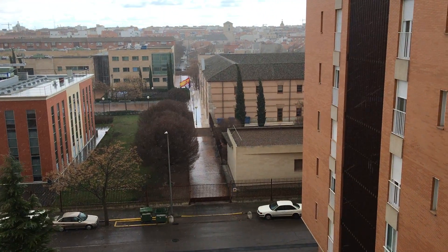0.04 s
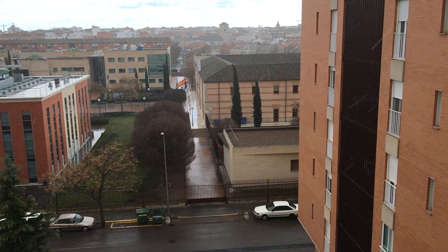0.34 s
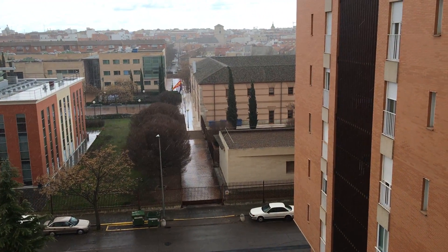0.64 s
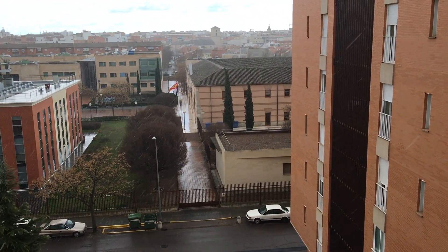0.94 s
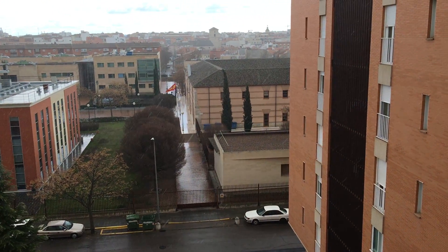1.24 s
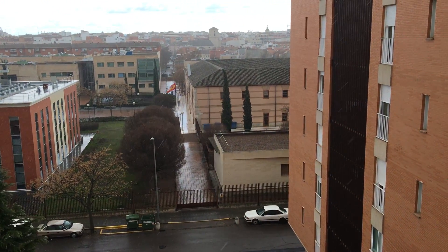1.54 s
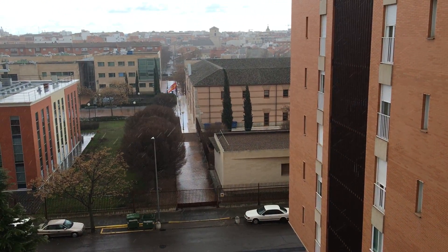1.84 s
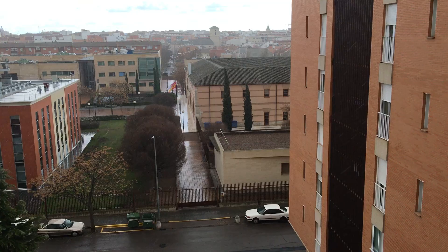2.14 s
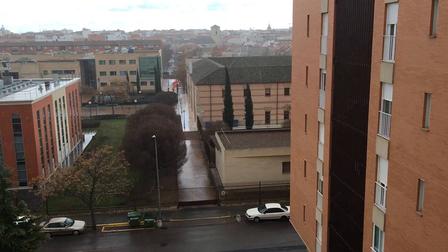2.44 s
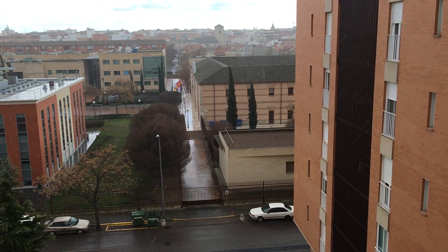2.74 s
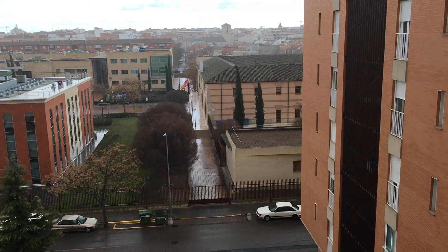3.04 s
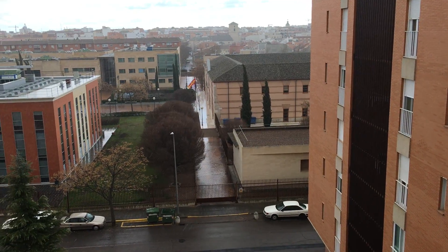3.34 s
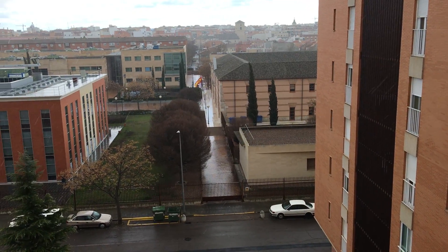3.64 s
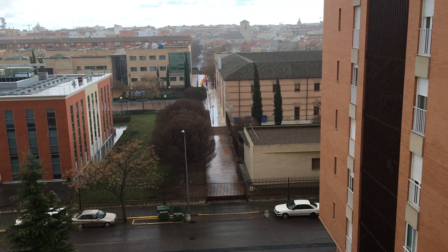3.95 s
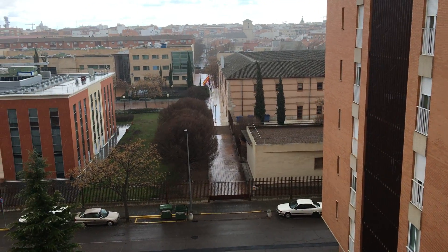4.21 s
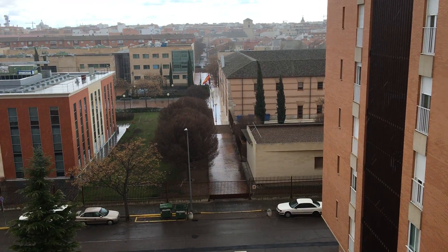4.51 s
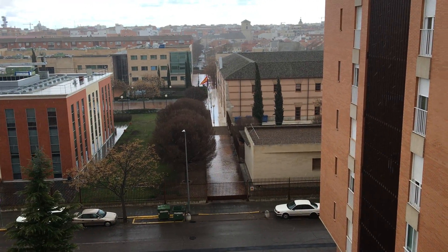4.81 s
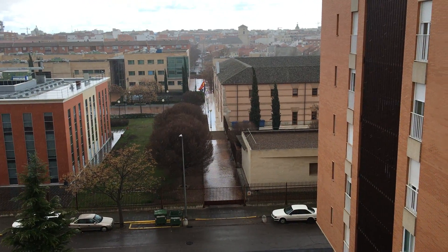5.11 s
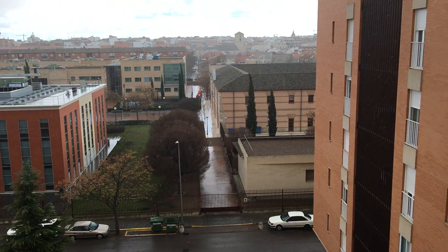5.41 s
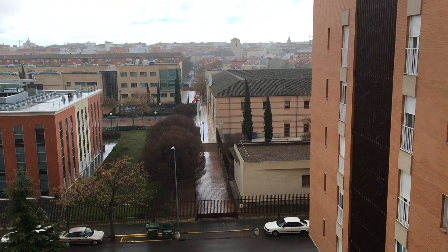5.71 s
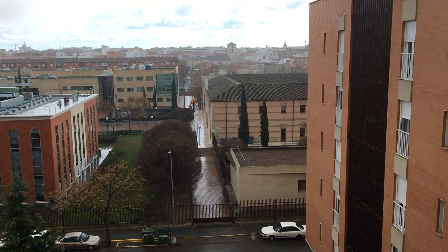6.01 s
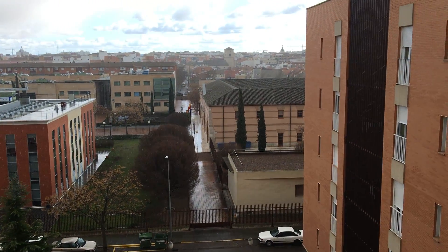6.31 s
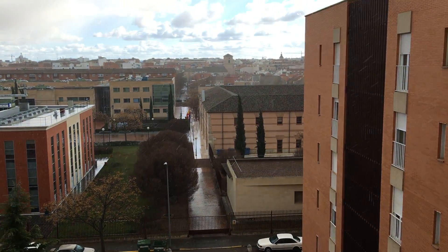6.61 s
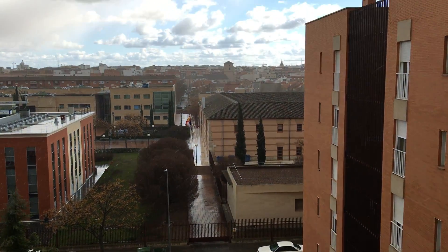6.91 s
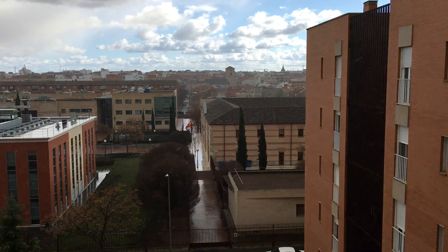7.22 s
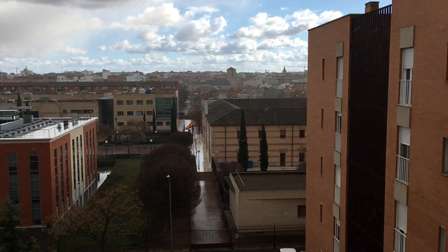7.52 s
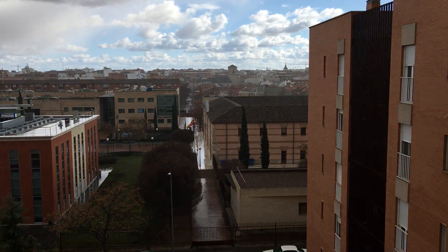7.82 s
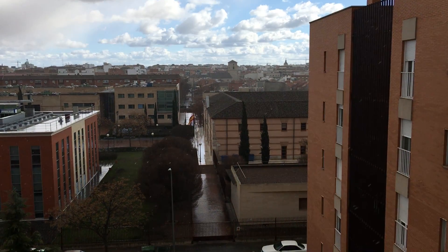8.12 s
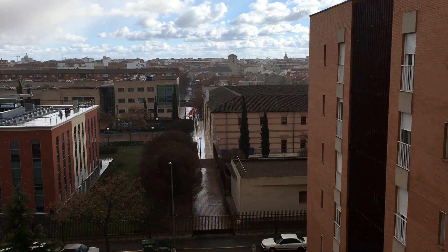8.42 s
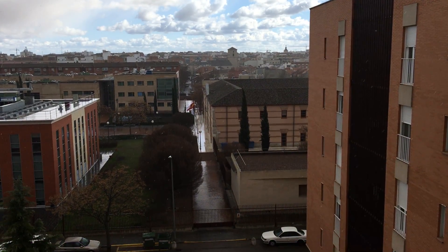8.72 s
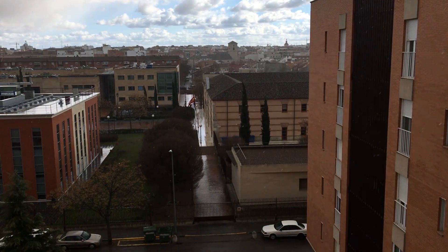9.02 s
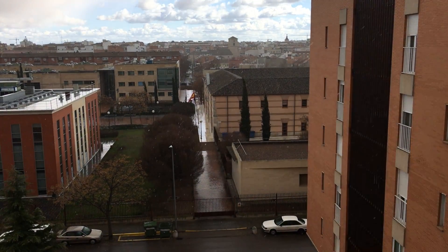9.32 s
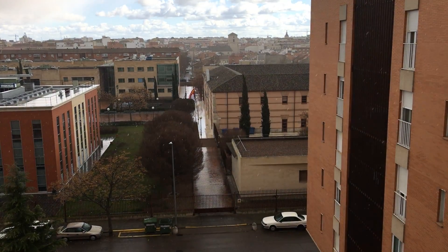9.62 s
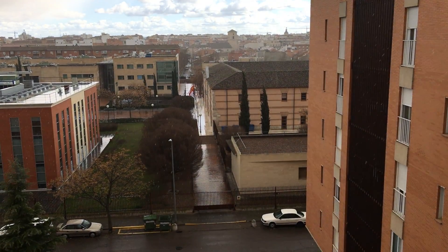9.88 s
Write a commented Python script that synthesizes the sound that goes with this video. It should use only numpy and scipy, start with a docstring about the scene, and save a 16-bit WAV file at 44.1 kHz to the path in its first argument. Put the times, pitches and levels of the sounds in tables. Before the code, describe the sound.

Light sleet hisses and ticks on a window sill while gusty wind thumps the microphone above faint wet street traffic.

```python
"""Light sleet over a wet street

Heard from a high window. Gusts rumble on the microphone and break into short buffets. Fine pellets hiss and
patter over the wash of distant tyres; pellets tap the sill and small knocks sound close by. A thin top hiss
lifts for a moment. Later, a far vehicle's brakes sing faintly."""
import sys
import numpy as np
from scipy import signal
from scipy.fft import rfft, irfft
from scipy.io import wavfile
from scipy.ndimage import uniform_filter1d

SR = 44100
rng = np.random.default_rng(int(sys.argv[2]) if len(sys.argv) > 2 else 0)


def generate_wav(sig):
    """Save sig (samples, or channels by samples) to the path in sys.argv[1] as 16-bit PCM at SR."""
    pcm = np.round(np.clip(np.atleast_2d(sig).T, -1, 1) * 32767).astype(np.int16)
    wavfile.write(sys.argv[1], SR, pcm)


N = 438794
TIME = np.arange(N) / SR
FREQS = np.maximum(np.arange(N // 2 + 1) * SR / N, 1)
BLOCK = 8192  # samples per tap or buffet
BLOCK_FREQS = np.maximum(np.arange(BLOCK // 2 + 1) * SR / BLOCK, 1)

# gusts on the microphone: (start [s], hold [s], relative level [dB])
WIND_GUSTS = [(.07, 0.02, -35.5), (.2, 0.077, -36), (.34, 0.26, -33), (.67, .22, -30), (1.19, 0.029, -38),
              (1.52, 0.25, -42), (1.88, 0.3, -36.5), (2.12, 0.1, -34.5), (2.3, 0.057, -38),
              (2.76, 0.2, -46.5), (3.58, 0.083, -31.5), (3.78, 0.16, -31.5), (4.03, 0.34, -24),
              (4.52, 0.049, -23.5), (4.62, .13, -30.5), (4.79, 0.093, -27.5), (5.01, 0.13, -34),
              (5.6, 0.22, -29.5), (6.02, 0.11, -36.5), (6.34, 0.16, -26.5), (6.6, 0.11, -27),
              (6.88, 0.4, -32), (6.99, 0.072, -21), (7.36, .19, -26), (7.58, 0.16, -40), (8.05, 0.13, -29),
              (8.28, 0.017, -29), (8.45, 0.29, -43), (8.8, 0.025, -31), (9.16, 0.25, -40),
              (9.36, 0.09, -28.5), (9.59, 0.15, -26), (9.82, 0.15, -34)]
# distant traffic: (time [s], relative level [dB])
TRAFFIC_LEVELS = [(0, -51.5), (2.9, -52), (4.4, -53.5), (9.95, -54)]
# tyre wash spectrum: (frequency [Hz], relative density [dB])
TRAFFIC_SPECTRUM = [(20, -24), (35, -6), (70, 4), (150, -5.5), (250, 4), (450, -3.5), (700, 0.5),
                    (1000, 2.5), (1400, -0.5), (2000, -3.5), (2600, -11), (4000, -24)]
# sleet spectrum: (frequency [Hz], relative density [dB])
SLEET_SPECTRUM = [(1200, -1.5), (2050, 4), (2650, -5), (3200, 1.5), (4200, 0), (4950, -3), (5550, 1.5),
                  (6500, -8.5), (8000, -12.5), (9600, -12.5), (10400, -19.5), (11200, -15.5), (15500, -24)]
# brief swells of sleet: (time [s], half length [s], rise [dB])
SLEET_SURGES = [(0.722, 0.13, 1.6), (6.3, .35, 2), (6.893, 0.15, 3)]
# sill and frame resonances: (frequency [Hz], bandwidth [Hz], relative gain [dB])
SILL_MODES = [(1465, 810, 18.5), (2210, 140, 7), (2980, 66, 9.5), (3700, 110, -15), (4150, 100, 9),
              (4230, 21, 11.5), (5370, 180, 0), (6460, 670, 4.5)]
# near knocks, scrapes, a squeak: (time [s], level [dB], centre [Hz], width [oct], t60 [s])
NEAR_KNOCKS = [(0.028, -38.5, 2210, 2.8, 0.057), (0.056, -42, 1400, 2.2, 0.1),
               (0.327, -38, 950, 0.4, 0.048), (3.518, -41, 600, 0.32, 0.033),
               (4.028, -30.5, 5100, 0.62, 0.017), (4.030, -38.5, 1000, 2.0, 0.15),
               (4.051, -56, 4500, 0.87, 0.2), (4.099, -50.5, 4000, 1.2, .2),
               (4.116, -40.5, 1200, .7, 0.093), (4.129, -38.5, 6150, 0.49, 0.02),
               (6.879, -52.5, 1700, 1.1, .39), (9.735, -52, 2270, 0.015, 0.26)]
# pellets on the sill: (time [s], level [dB], centre [Hz], width [oct])
PELLET_TAPS = [(.522, -47, 4200, 1.1), (.95, -51, 4200, .15), (2.398, -48.5, 4000, .7),
               (3.331, -59, 4200, .1), (3.812, -51, 3400, .4), (4.76, -51, 3580, 0.56),
               (4.849, -54, 4080, .2), (5.158, -53, 6000, 1.2), (6.367, -57, 8000, .4),
               (6.87, -45.5, 4870, 0.21), (8.5, -45, 3900, 0.33), (9.066, -45.5, 3380, 1.2),
               (9.095, -50, 6060, 1.1), (9.292, -41.5, 3570, 0.36), (9.302, -43, 3670, 0.65),
               (9.316, -44.5, 3400, .35), (9.839, -45.5, 2250, 0.13)]
# strongest eddies on the microphone: (time [s], relative level [dB], corner [Hz], length [s])
STRONG_EDDIES = [(.305, -27, 85, 0.0083), (.351, -27.5, 131, .016), (.416, -27, 142, 0.02),
                 (.552, -36, 122, 0.011), (.619, -27.5, 68, 0.014), (.695, -32.5, 145, .028),
                 (.739, -26.5, 84.5, .023), (1.215, -32.5, 83, 0.038), (1.534, -34, 76.6, 0.0064),
                 (1.611, -30.5, 97, 0.012), (2.144, -26, 114, 0.023), (3.616, -26.5, 87.4, 0.024),
                 (3.89, -24.5, 99, 0.023), (4.038, -26, 55, 0.016), (4.119, -17.5, 228, 0.018),
                 (4.15, -23, 195, 0.021), (4.22, -21.5, 183, 0.021), (4.287, -19, 210, 0.013),
                 (4.342, -22, 201, 0.02), (4.56, -22, 109, 0.031), (4.902, -22.5, 135, 0.03),
                 (5.125, -38, 101, 0.028), (5.618, -19.5, 93, 0.018), (5.694, -28.5, 124, 0.0071),
                 (6.365, -27, 81, 0.036), (6.489, -29, 80, 0.0055), (6.628, -26.5, 140, 0.0065),
                 (6.982, -27.5, 152, 0.12), (7.013, -23, 200, 0.02), (7.105, -30.5, 131, 0.074),
                 (7.412, -22.5, 150, .036), (7.518, -26, 99, 0.016), (8.298, -28.5, 120, .028),
                 (8.38, -28.5, 85, 0.025), (8.643, -37.5, 89, 0.02), (9.366, -26, 93, 0.015),
                 (9.436, -31, 88, 0.0075), (9.66, -27, 128, 0.043), (9.832, -31.5, 98, 0.013),
                 (9.896, -27, 121, 0.0061)]
# brake tones: (frequency [Hz], relative level [dB])
BRAKE_PARTIALS = [(931, 1), (1392, -6)]
# brake squeals: (start [s], hold [s], level [dB])
BRAKE_SQUEALS = [(6.16, .12, -55), (6.35, .04, -55), (6.48, 0.15, -58), (6.78, 0.31, -59.5)]


def undb(db):
    """Decibels to gain."""
    return 10 ** (np.asarray(db) / 20)


def unit(x):
    """Scale to rms 1."""
    return x / np.sqrt(np.mean(x ** 2))


def shaped(x, gain):
    """Filter by a gain per frequency."""
    return irfft(rfft(x) * gain, len(x))


def colour(points):
    """Gain per frequency from (Hz, dB) points."""
    hz, db = np.transpose(points)
    return undb(np.interp(np.log(FREQS), np.log(hz), db))


def bell(hz, centre_hz, width_oct):
    """Gaussian passband in log frequency."""
    return np.exp(-(np.log2(hz / centre_hz) / width_oct) ** 2 / 2)


def walk(rate_hz):
    """Smooth random drift, rms 1."""
    return unit(shaped(rng.standard_normal(N), np.exp(-(FREQS / rate_hz) ** 2)))


def chance_times(per_s):
    """One random time in each slot of about 1 / per_s seconds."""
    count = int(per_s * N / SR)
    return (np.arange(count) + rng.random(count)) * N / SR / count


def swells(rows, attack_s, release_s):
    """Gain of (start, hold, dB) events with exponential flanks; powers add."""
    power = 0
    for start, hold, db in rows:
        before = np.maximum(start - TIME, 0) / attack_s
        after = np.maximum(TIME - start - hold, 0) / release_s
        power += undb(db) ** 2 * np.exp(-2 * np.minimum(before + after, 20))
    return np.sqrt(power)


def wind(lull_db=-51.5):
    """Wind strength in dB: gusts over light steady air."""
    gusts = swells(WIND_GUSTS, attack_s=.018, release_s=.032)
    return 20 * np.log10(np.hypot(gusts, undb(lull_db)))


def turbulence(hz, corner_hz, slope=1.58):
    """Pressure spectrum: flat to the corner, then falling, steeply past the smallest eddies."""
    return (1 + (hz / corner_hz) ** 2) ** (-slope / 2) / np.sqrt(1 + (hz / (4 * corner_hz)) ** 8)


def mic_port(hz, low_cut_hz=63, damping=.62, leak_hz=54):
    """The microphone sheds deep bass and rings briefly at its low edge."""
    s = 1j * hz / low_cut_hz
    return s ** 2 / (s ** 2 + damping * s + 1) * (1j * hz / (1j * hz + leak_hz)) ** 2


def wind_rumble(wind_db, slow_hz=40, fast_hz=58, flutter_db=4):
    """Large eddies rumble on the microphone; faster air is louder and carries smaller ones."""
    level_db = wind_db + flutter_db * walk(35)
    speed = np.clip((level_db + 47.5) / 22, 0, 1)
    air = rng.standard_normal(N)
    slow, fast = (unit(shaped(air, turbulence(FREQS, hz) * mic_port(FREQS)))
                  for hz in (slow_hz, fast_hz))
    flow = (1 - speed) * slow + speed * fast
    # partly levelled, so the pressure swing follows the wind
    power = uniform_filter1d(uniform_filter1d(flow ** 2, size=1500), size=1100)
    return unit(flow / (power + .02) ** .25) * undb(level_db - 3.5)


def traffic(low_hz=30.7, flicker_db=1.26):
    """Tyres on wet roads, blurred by distance; each half-octave band wanders in level."""
    tyres = shaped(rng.standard_normal(N), colour(TRAFFIC_SPECTRUM))
    half_octaves = 2 * np.log2(FREQS / low_hz)
    wash = np.zeros(N)
    for k in range(17):
        band = shaped(tyres, np.maximum(1 - abs(half_octaves - k), 0))
        wash += band * undb(flicker_db * walk(18))
    level_db = np.interp(TIME, *np.transpose(TRAFFIC_LEVELS))
    return unit(wash) * undb(level_db - .13)


def sleet(pellets_per_s=420, splash_s=.00071, patter_db=-6.88, sizzle_hz=6500,
          steady_db=-61.28, heavy_db=8, ease_s=1.12, flutter_db=.73):
    """Far pellets merge into hiss; nearer ones tick, each with a tiny splash. The fall eases."""
    hits = (rng.random(N) < pellets_per_s / SR) * undb(3 * np.minimum(rng.exponential(size=N), 4.3))
    splash_power = signal.lfilter([1], [1, -np.exp(-1 / (splash_s * SR))], hits ** 2)
    patter = unit(np.sqrt(splash_power) * rng.standard_normal(N))
    fall = shaped(rng.standard_normal(N) + undb(patter_db) * patter, unit(colour(SLEET_SPECTRUM)))
    surge_db = sum(db * np.exp(-((TIME - s) / half_s) ** 2) for s, half_s, db in SLEET_SURGES)
    level_db = steady_db + heavy_db * np.exp(-TIME / ease_s) + surge_db + flutter_db * walk(6)
    # a heavier fall is brighter
    treble = shaped(fall, np.exp(-(2 * np.log2(FREQS / sizzle_hz)) ** 2))
    sizzle = undb(.85 * (level_db - level_db.mean())) - 1
    return (fall + sizzle * treble) * undb(level_db)


def stray_pellets(per_s=2.5, level_db=-59.5, spread_db=1.3, centre_hz=4800, spread_oct=.3, width_oct=.4):
    """Faint pellets reach the sill by chance; rows as PELLET_TAPS."""
    times = chance_times(per_s)
    return [(s, level_db + spread_db * force, centre_hz * 2 ** (spread_oct * pitch), width_oct)
            for s, (force, pitch) in zip(times, rng.standard_normal((len(times), 2)))]


def sill_taps(ring_db=11, pellet_t60_s=.058, skirt=.018):
    """Pellets crack on the sill and near knocks sound close by; each rings briefly through the same resonances."""
    modes = sum(undb(db) / np.hypot(1, 2 * (BLOCK_FREQS - hz) / width_hz)
                for hz, width_hz, db in SILL_MODES)
    body = 1 + undb(ring_db) * modes
    pellets = [(*row, pellet_t60_s) for row in list(PELLET_TAPS) + stray_pellets()]
    out = np.zeros(N + BLOCK)
    for s, db, hz, width_oct, t60_s in list(NEAR_KNOCKS) + pellets:
        contact = bell(BLOCK_FREQS, hz, width_oct) + skirt
        crack = unit(shaped(rng.standard_normal(BLOCK), body * contact))
        start = int(s * SR)
        out[start:start + BLOCK] += crack * undb(db - 60 * TIME[:BLOCK] / t60_s)
    return out[:N]


def stray_eddies(wind_db, per_s=18, spread_db=2, corner_hz=117, oct_per_db=.08, length_s=.011):
    """Weak chance eddies, louder and brighter in stronger wind; rows as STRONG_EDDIES."""
    times = chance_times(per_s)
    strengths_db = np.interp(times, TIME, wind_db) + spread_db * rng.standard_normal(len(times))
    corners_hz = corner_hz * 2 ** (oct_per_db * (strengths_db - wind_db.max()))
    return [(s, db - 7.5, hz, length_s) for s, db, hz in zip(times, strengths_db, corners_hz)]


def buffets(wind_db, kick=1.04):
    """Eddies burst on the microphone port: each a sharp pressure kick inside a short flurry."""
    mid = BLOCK // 2
    t = TIME[:BLOCK] - TIME[mid]
    taper = signal.get_window(("tukey", .5), BLOCK)
    out = np.zeros(N + BLOCK)
    for s, db, corner_hz, length_s in list(STRONG_EDDIES) + stray_eddies(wind_db):
        flank_s = length_s * np.where(t < 0, .35, .65)  # fast rise, slower fall
        push = rng.standard_normal(BLOCK) * np.exp(-(t / flank_s) ** 2 / 2)
        push[mid] += kick * np.linalg.norm(push)
        thump = shaped(push, turbulence(BLOCK_FREQS, corner_hz) * mic_port(BLOCK_FREQS)) * taper
        peak_rms = np.sqrt(uniform_filter1d(thump ** 2, size=800).max())
        start = int(s * SR)
        out[start:start + BLOCK] += undb(db + 2.54) * thump / peak_rms
    return out[mid:mid + N]


def fine_hiss(start_s=4.3, hold_s=.62, level_db=-76):
    """A thin hiss at the very top comes and goes."""
    hiss = unit(shaped(rng.standard_normal(N), bell(FREQS, centre_hz=13000, width_oct=.4)))
    return hiss * swells([(start_s, hold_s, level_db)], attack_s=.03, release_s=.03)


def brakes(waver=.0047, blur=.38):
    """A faint far squeal, smeared by house fronts: pitch and level waver."""
    phase_per_hz = 2 * np.pi * np.cumsum(1 + waver * walk(25)) / SR
    squeal = sum(undb(db) * np.sin(hz * phase_per_hz) * (1 + blur * walk(25))
                 for hz, db in BRAKE_PARTIALS)
    return unit(squeal) * swells(BRAKE_SQUEALS, attack_s=.03, release_s=.04)


def scene():
    """All sources at one microphone."""
    wind_db = wind()
    background = wind_rumble(wind_db) + traffic() + sleet() + fine_hiss() + brakes()
    return (background + buffets(wind_db) + sill_taps())[None]


def record(dry, top_hz=15600):
    """Steep elliptic low-pass."""
    return signal.sosfilt(signal.ellip(10, .1, 80, top_hz, fs=SR, output="sos"), dry)


dry = scene()
out = record(dry)
generate_wav(out)
```